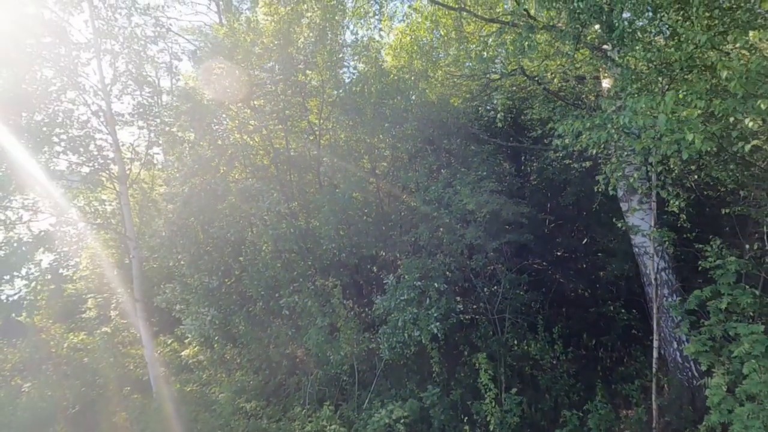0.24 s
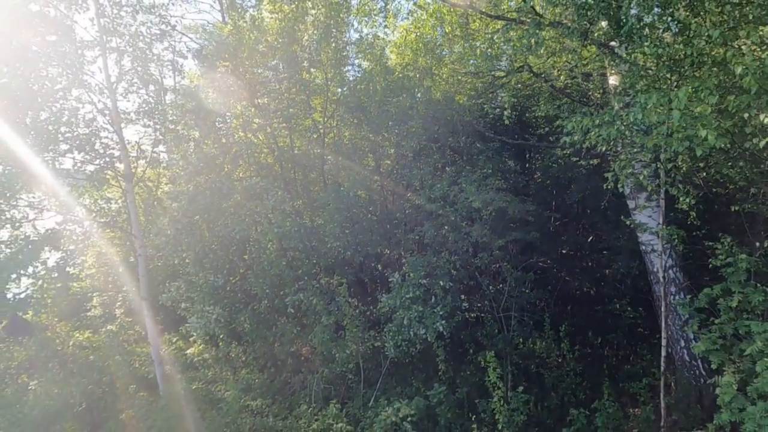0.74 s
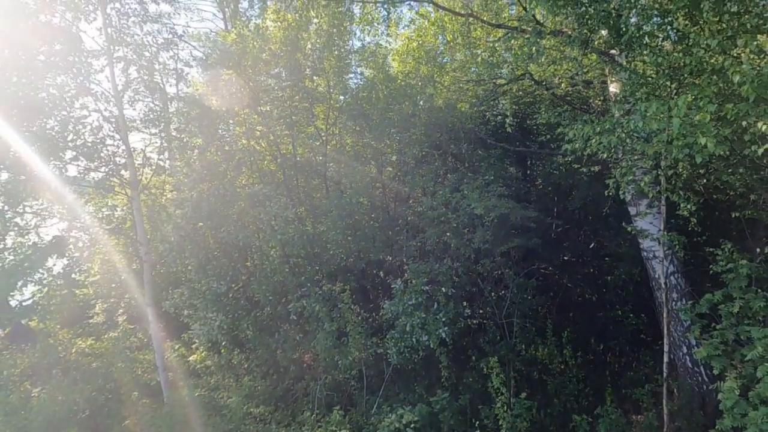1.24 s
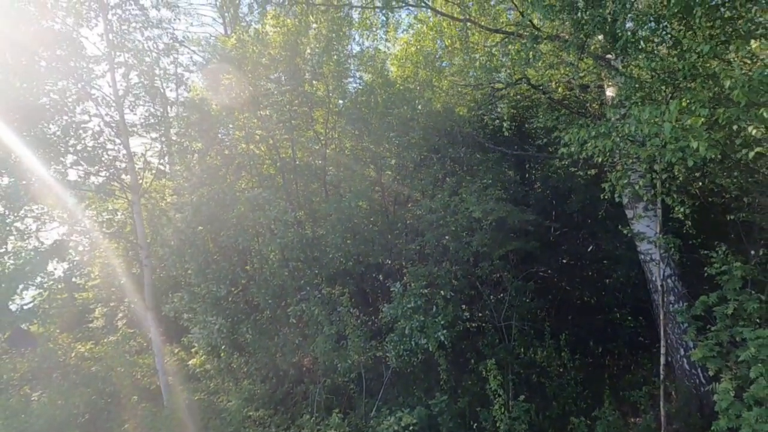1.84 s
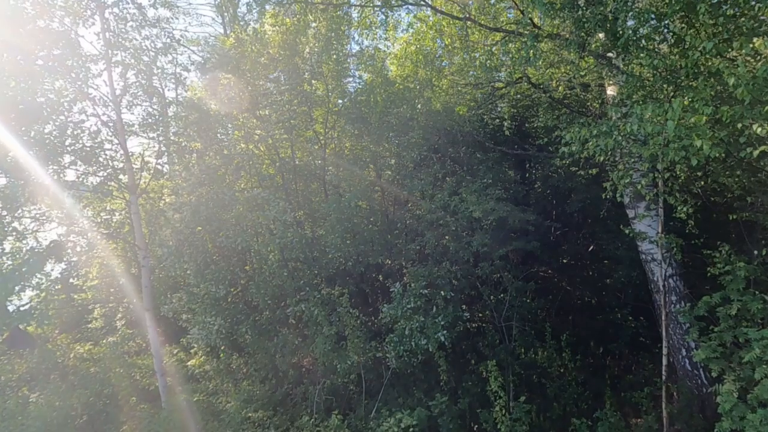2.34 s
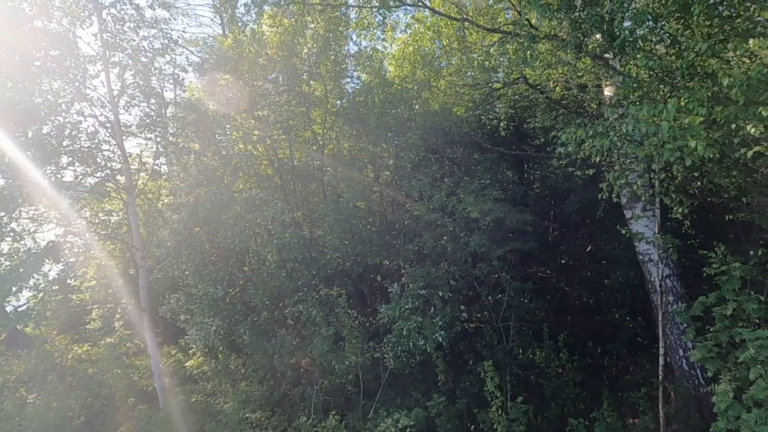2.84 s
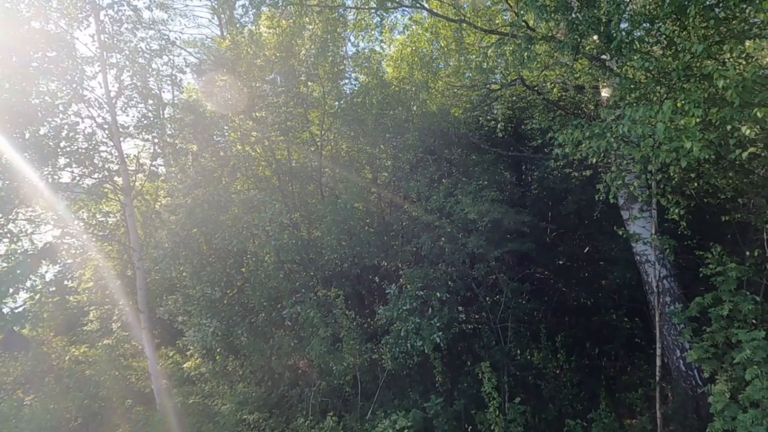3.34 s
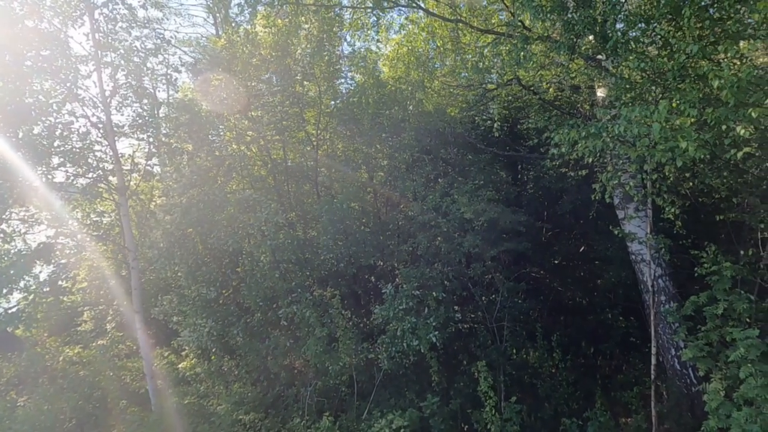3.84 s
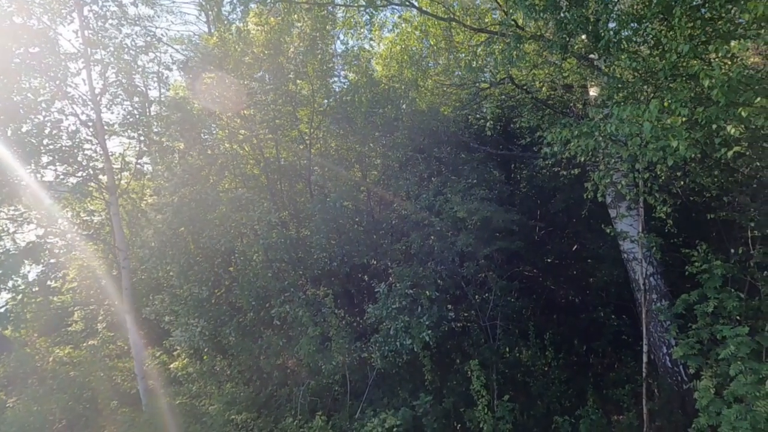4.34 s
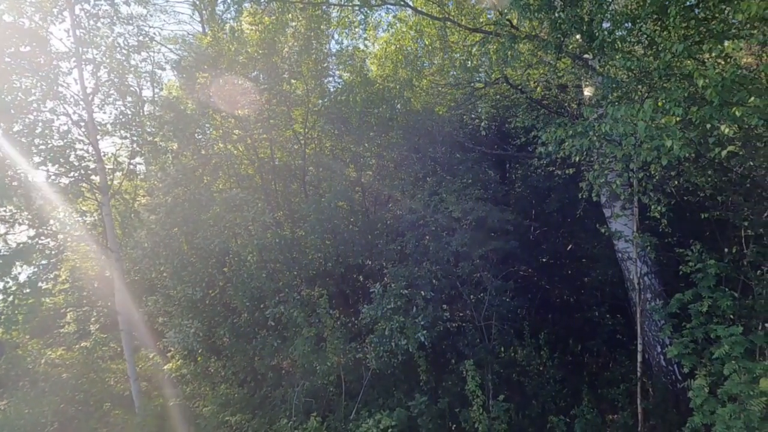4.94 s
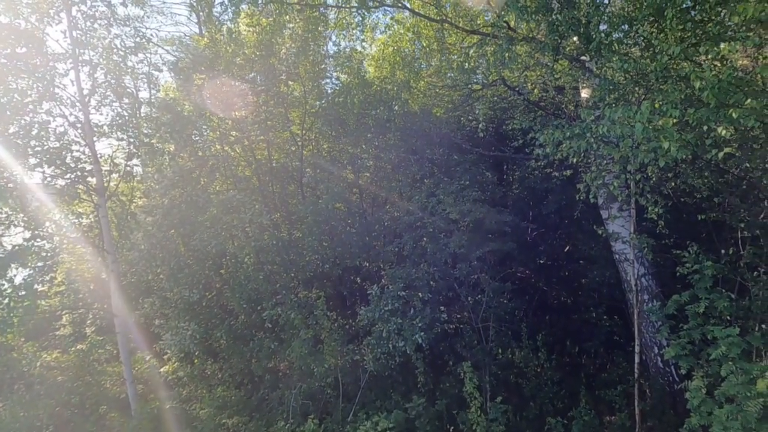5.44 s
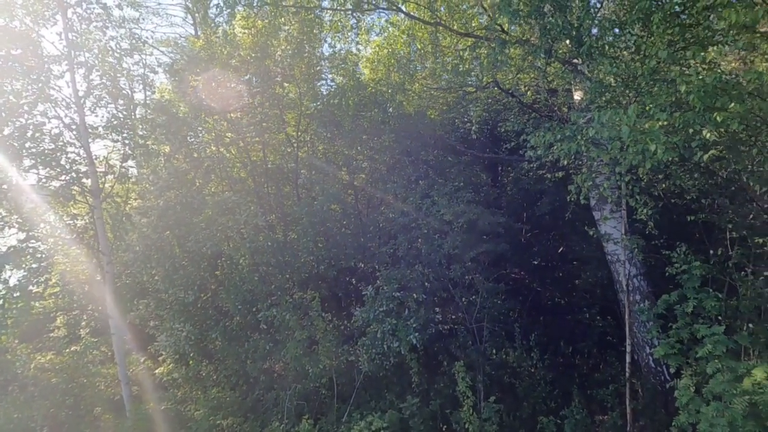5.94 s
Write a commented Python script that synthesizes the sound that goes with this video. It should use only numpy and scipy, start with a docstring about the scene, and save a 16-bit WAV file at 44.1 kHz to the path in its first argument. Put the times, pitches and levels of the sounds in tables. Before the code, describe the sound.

Low wobbling handling noise and muffled knocks cover quiet woodland birdsong. One clear near whistle swells and lifts at once, then a small snap. Farther birds sing thin chirps, regular little chucks and repeated falling notes, blurred by sparse tree echoes. Three brief throbbing trills stand out, the last near the end as the rumble calms. A faint hum fades midway; leaves and microphone hiss softly.

```python
"""One near whistle, three buzzy trills and a farther songster in a wood, heard by a small hand-held camera.
Voices are nearly pure gliding tones; blurred calls are throbbing noise bands. The trees add sparse echoes.
The hand shakes and bumps the camera: deep shaped noise and falling sweeps with a dull ring dominate.
Behind lie a fading low hum, a twig-like snap and a patchy hiss of leaves, far chorus and microphone."""
import sys
import numpy as np
from scipy import signal
from scipy.fft import rfft, irfft
from scipy.io import wavfile
from scipy.ndimage import uniform_filter1d

SR = 44100
rng = np.random.default_rng(int(sys.argv[2]) if len(sys.argv) > 2 else 0)


def log_audio(samples):
    """Write samples as a 16-bit WAV file to the path given in sys.argv[1]."""
    # one column per channel
    frames = np.atleast_2d(samples).T
    # limit to full scale, then quantise
    limited = np.clip(frames, -1, 1)
    pcm = np.round(limited * 32767).astype(np.int16)
    wavfile.write(sys.argv[1], SR, pcm)


N = 273420

# handling levels over time: t/s, slow shake level/dB, rumble level/dB
HANDLING_CURVE = [(0, -18.5, -32), (.6, -24.5, -41), (1.2, -26, -36.5), (1.75, -27.5, -40.5),
                  (2.15, -20, -38.5), (2.6, -16.5, -30), (3.1, -25, -33.5), (3.7, -33, -36),
                  (4.2, -23.5, -35.5), (4.7, -30.5, -35.5), (5.1, -21, -32.5), (5.5, -27.5, -43.5),
                  (5.9, -34.5, -47.5), (6.2, -59, -54.5)]


def gain_of(db):
    """Decibels to an amplitude factor."""
    return 10 ** (np.asarray(db) / 20)


def evened(x):
    """Scales to rms 1."""
    return x / np.sqrt(np.mean(x ** 2) + 1e-20)


def along(rows, column):
    """One column of a curve, interpolated at every sample."""
    columns = np.transpose(rows)
    return np.interp(np.arange(N) / SR, columns[0], columns[column])


def add(mix, start_s, sound):
    """Mixes a sound in at start_s, cut at the end of the mix."""
    part = mix[round(start_s * SR):][:len(sound)]
    part += sound[:len(part)]


def noise(points, count=N):
    """Gaussian noise of rms 1, shaped by (f/Hz, level/dB) points; near silent outside them."""
    f, db = np.transpose(points)
    hz = np.fft.rfftfreq(count, 1 / SR)
    shape = gain_of(np.interp(np.log(hz + 1), np.log(f + 1), db, -150, -150))
    return evened(irfft(rfft(rng.standard_normal(count)) * shape, count))


def sine(hz, overtone_db=-30):
    """A bird's voice of rms near 1: a tone with a weak octave overtone."""
    phase = 2 * np.pi * np.cumsum(hz) / SR
    return np.sqrt(2) * (np.sin(phase) + gain_of(overtone_db) * np.sin(2 * phase))


def wood(x, t60_s, build_s):
    """Echoes off trunks and leaves: sparse taps of random sign that build up, then die away."""
    taps = np.zeros(SR)
    at = np.arange(0, SR - 20, 20) + rng.integers(0, 20, (SR - 1) // 20)
    taps[at] = rng.choice([-1., 1.], at.shape)
    t = np.arange(SR) / SR
    taps *= gain_of(-60 * t / t60_s) * np.clip(t / build_s, 0, 1)
    return signal.fftconvolve(x, taps / np.linalg.norm(taps))[:N]


def near_birds():
    """The whistle, the trills and the snap, fairly dry: direct sound with weaker echoes."""
    # start t/s, centre f/Hz, level/dB before shaping, pace (1 = usual), climb/Hz, strokes last/s at pace 1
    trill_rows = [(2.813, 3350, -56, .97, 100, .104), (4.197, 3350, -52, .98, 160, .127),
                  (5.658, 3330, -49, .945, -30, .106)]
    whistles, trills = np.zeros((2, N))
    add(whistles, .015, whistle())
    for start_s, *row in trill_rows:
        add(trills, start_s, trill(*row))
    add(trills, .305, snap())
    whistle_echo = gain_of(-10) * wood(whistles, t60_s=.63, build_s=.008)
    trunk_echo = gain_of(-9) * wood(trills, t60_s=.11, build_s=.01)  # trunks close by
    far_echo = gain_of(-14.5) * wood(trills, t60_s=.62, build_s=.04)
    return whistles + whistle_echo + trills + trunk_echo + far_echo


def whistle():
    """A tone that starts flat and swells, then lifts in pitch and fades."""
    peak_hz, peak_db, overtone_db = 1918, -38, -41.5
    swell_s, swell_db, scoop_hz = .058, -19, -41
    lift_s, lift_db, lift_hz = .055, -10.5, 128
    t = np.arange(-swell_s, lift_s, 1 / SR)
    swell = np.maximum(-t / swell_s, 0)
    lift = np.maximum(t / lift_s, 0)
    hz = peak_hz + scoop_hz * swell ** 2 + lift_hz * lift ** 2
    level = gain_of(peak_db + swell_db * swell + lift_db * lift)
    return level * sine(hz, overtone_db) * signal.windows.tukey(len(t), .12)


def trill(hz, db, pace, climb_hz, strokes_s):
    """The pitch snaps up and slides down again, ever wider and slower; high is loud."""
    lead_s, lead_high = .032, .26  # lead-in slides down from this share of the swing above centre
    fast_per_s, slow_per_s, slowing_s = 62, 42, .04  # stroke rates at pace 1
    swing_hz, widening_s, growth_db, growing_s = 510, .046, 7.5, .18
    rise_db, fall_db, fall_s = -14, -5, .03
    t = np.arange(0, lead_s + strokes_s, pace / SR)  # clock of the trill: pace below 1 stretches it
    after = np.maximum(t - lead_s, 0)
    lead = np.clip(1 - t / lead_s, 0, 1)
    width = 1 - np.exp(-t / widening_s)

    rate_per_s = slow_per_s + (fast_per_s - slow_per_s) * np.exp(-after / slowing_s)
    turns = np.cumsum((t > lead_s) * rate_per_s) * pace / SR
    saw = uniform_filter1d(np.interp(turns % 1, [0, .13, 1], [-1, 1, -1]), size=60)
    saw = saw * (1 - lead) ** 6

    shape_db = rise_db * lead ** 2 + growth_db * (np.clip(t / growing_s, 0, 1) - 1)
    shape_db = shape_db + fall_db * np.clip(1 - (t[-1] - t) / fall_s, 0, 1) ** 2
    # strokes differ in strength and in height
    shape_db = shape_db + 2 * noise([(8, 0), (60, 0), (130, -12)], count=len(t))
    uneven_hz = 40 * noise([(8, 0), (30, 0), (80, -14)], count=len(t))
    level = gain_of(db + shape_db + 4 * saw * width) * signal.windows.tukey(len(t), .07)
    hz = hz + climb_hz * after / strokes_s + uneven_hz
    return level * sine(hz + swing_hz * (width * saw + lead_high * lead), overtone_db=-40.5)


def snap():
    """A twig-like snap with a short rustle: band noise under a fast and a slow decay."""
    t = np.arange(3000) / SR
    crack = np.clip(t / .0014, 0, 1) * gain_of(-60 * t / .014)
    rustle = gain_of(-13 - 60 * t / .32)
    grain = noise([(1200, 8), (2300, 3), (4500, 8.5), (9000, -14)], count=len(t))
    return gain_of(-53.5) * (crack + rustle) * grain


def far_birds():
    """Songs from deeper in the wood, as much echo as direct sound."""
    # single glides: start t/s, length/s, start f/Hz, end f/Hz, level/dB
    glides = [(.25, .07, 2210, 2290, -73), (.97, .18, 3750, 2750, -82), (1.485, .055, 4960, 4400, -74),
              (1.612, .042, 3850, 4850, -73), (1.729, .026, 3800, 4400, -71),
              (1.843, .062, 3850, 4650, -72), (1.945, .055, 4060, 4150, -69),
              (2.065, .065, 4120, 4150, -72), (2.207, .052, 4070, 4130, -66.5),
              (3.22, .14, 1575, 1560, -86), (3.505, .095, 4680, 4620, -74), (3.522, .07, 3850, 3850, -74),
              (3.69, .2, 1482, 1470, -84.5), (4.48, .05, 980, 1040, -77), (4.97, .16, 2830, 2880, -72),
              (5.18, .05, 3650, 4050, -69), (5.208, .03, 4000, 4750, -71.5), (.69, .11, 3400, 3760, -80),
              (5.235, .08, 4820, 4760, -74.5), (5.274, .024, 3800, 3000, -71.5),
              (5.3, .06, 3060, 3020, -75), (5.423, .035, 2980, 2540, -73), (5.512, .13, 2640, 2490, -73.5),
              (5.885, .075, 2200, 2520, -77), (5.945, .05, 2480, 3230, -73.5), (5.98, .07, 3200, 3170, -70),
              (6.108, .032, 3330, 3980, -69)]
    # recurring glides by name: length/s, start f/Hz, end f/Hz, level/dB
    figures = {"chuck": (.02, 2750, 1350, -74), "pipe": (.06, 1930, 1960, -81),
               "flick": (.025, 4140, 3550, -72), "dip": (.045, 3520, 3170, -73),
               "climb": (.066, 3270, 3950, -72), "pip": (.028, 4780, 4880, -76),
               "hook": (.02, 2620, 3040, -75)}
    # by figure name: list of start t/s
    figure_starts = {"chuck": [1.365, 1.532, 1.699, 1.865, 2.032, 2.372], "pipe": [1.513, 2.18, 2.847],
                     "flick": [1.997, 2.127, 2.257], "dip": [2.342, 2.525], "climb": [2.397, 2.575], "pip":
                     [3.058, 3.73, 3.908], "hook": [3.165, 3.315]}
    # a falling syllable sung again and again: start t/s, end f/Hz, level/dB at its end
    fall_rows = [(2.726, 2520, -68), (3.029, 2520, -68), (3.175, 2520, -67.5), (3.334, 2520, -67.5),
                 (3.452, 2250, -72.5), (3.627, 2250, -72), (3.797, 2250, -70), (3.96, 2250, -75),
                 (4.13, 2250, -74.5)]
    # blurred chirps: start t/s, length/s, centre f/Hz, level/dB
    chirp_rows = [(0.768, 0.17, 5540, -76), (1.304, 0.12, 5370, -72.5), (1.683, 0.039, 5680, -72),
                  (2.12, 0.068, 6030, -74), (2.842, 0.082, 6070, -77.5), (3.46, 0.042, 4830, -68),
                  (3.499, 0.071, 4380, -70.5), (4.068, 0.055, 4300, -73.5), (5.215, 0.11, 3870, -76)]
    # narrower warbles: start t/s, length/s, centre f/Hz, level/dB
    warbles = [(1.755, .03, 4150, -76), (4.77, .14, 2160, -78), (6.13, .05, 3720, -69)]
    fall_s, fall_top_hz, fall_gain_db = .076, 4900, 15
    buzz_s, buzz_hz, buzz_db = .05, 3930, -3.5  # rides on the upper part of a fall; level relative to it
    dry, falls = np.zeros((2, N))
    for start_s, *row in glides:
        add(dry, start_s, note(*row))
    for name, row in figures.items():
        for start_s in figure_starts[name]:
            add(dry, start_s, note(*row))
    for start_s, end_hz, db in fall_rows:
        add(falls, start_s, note(fall_s, fall_top_hz, end_hz, db, fall_gain_db))
        add(dry, start_s, chirp(buzz_s, buzz_hz, db + buzz_db))
    for start_s, *row in chirp_rows:
        add(dry, start_s, chirp(*row))
    for start_s, *row in warbles:
        add(dry, start_s, chirp(*row, share=.1))
    near_trees = gain_of(-7) * wood(dry + falls, t60_s=.1, build_s=.003)
    # the singer of the falls sits nearer: its falling tones get less far echo
    deep_trees = wood(dry + gain_of(-5) * falls, t60_s=.82, build_s=.012)
    return dry + falls + near_trees + deep_trees


def note(length_s, start_hz, end_hz, db, gain_db=0):
    """A soft-ended glide, gaining gain_db on its way; moving air and leaves make it flutter and waver."""
    bend = 1.3  # starts fast, eases into the end pitch
    u = np.linspace(0, 1, round(length_s * SR))
    chance = rng.standard_normal((2, len(u) + 300))
    smooth = uniform_filter1d(uniform_filter1d(chance, size=130), size=130)
    flutter, waver = 14 * smooth[:, 150:-150]  # rms near 1
    hz = (end_hz + (start_hz - end_hz) * (1 - u) ** bend) * (1 + .007 * waver)
    level = gain_of(db + gain_db * (u - 1) + 2.2 * flutter)
    return level * sine(hz) * signal.windows.tukey(len(u), .5)


def chirp(length_s, hz, db, share=.4):
    """A blurred, throbbing band of fuzz: a chirp or the buzzy part of a call; share = half width / centre."""
    count, width_hz = round(length_s * SR), share * hz
    edges = [(hz - width_hz, -20), (hz - width_hz / 3, 0), (hz + width_hz / 3, 0), (hz + width_hz, -20)]
    band = noise(edges, count=count)
    throb = 1 + .38 * np.sin(2 * np.pi * (44 * np.arange(count) / SR + rng.random()))  # 44 Hz
    return gain_of(db) * band * throb * signal.windows.tukey(count, .5)


def thumps():
    """All bumps on the camera body; those in one stretch are duller."""
    # start t/s, level/dB, ring f/Hz
    bumps = [(0.775, -31.5, 52), (1.079, -34, 62), (1.186, -31, 55), (1.726, -17.5, 69.6),
             (1.936, -26.5, 45.3), (2.117, -26, 70.5), (2.204, -18.5, 49), (2.493, -29.5, 65.4),
             (2.628, -31.5, 46), (3.024, -28, 53), (3.194, -27.5, 67.5), (3.32, -30, 68.6),
             (3.384, -32, 64), (3.438, -31, 64), (3.574, -24.5, 62), (3.743, -30.5, 47.6),
             (3.923, -22, 79.4), (4.2, -34.5, 69.6), (4.318, -23, 65.2), (5.524, -30.5, 81),
             (5.588, -26.5, 57), (6.009, -39, 73.7)]
    dull_from_s, dull_to_s = .7, 2.7
    out = np.zeros(N)
    for start_s, db, ring_hz in bumps:
        add(out, start_s, gain_of(db) * bump(ring_hz, dull_from_s < start_s < dull_to_s))
    return out


def bump(ring_hz, dull):
    """A bump spreads through the body, its high part first: a falling sweep, then a dull ring."""
    sweep_span_hz = 178.2 * (.5 if dull else 1)
    skirt_db = -24 + (-17 if dull else 0)  # upper skirt of the ring
    t = np.arange(round(.3 * SR)) / SR
    hz = .88 * ring_hz + sweep_span_hz * np.exp(-t / .0092)
    sweep = np.sin(2 * np.pi * np.cumsum(hz) / SR) * (t / .015) ** 2 * np.exp(2 - 2 * t / .014)
    spectrum = [(.5 * ring_hz, -20), (ring_hz, 0), (1.44 * ring_hz, -4), (180, skirt_db), (300, -38)]
    ring = noise(spectrum, count=len(t))
    return sweep + ring * np.clip(t / .019, 0, 1) * gain_of(-2.5 - 60 * t / .27)


def handling():
    """Shake and rumble, ramped up at the start, plus the hum; rumble and hum share their lumps."""
    lumps = noise([(1, -13.5), (6, -4), (14, -22)])
    ramp = np.clip(.15 + np.arange(N) / SR / .05, 0, 1)
    rumbling, humming = rumble(lumps), hum(lumps)
    return (shake() + rumbling) * ramp + humming


def shake():
    """The slow shake of the hand: very low noise that follows the handling curve."""
    # f/Hz, density level/dB
    shake_spectrum = [(2, -7.5), (7, -4), (11, -1.5), (16, -15.5), (24, -17), (36, -39.5)]
    return gain_of(along(HANDLING_CURVE, column=1)) * noise(shake_spectrum)


def rumble(lumps):
    """Low noise made lumpy by a slow random level, following the handling curve."""
    # f/Hz, density level/dB
    rumble_spectrum = [(12, -6.5), (25, 4), (60, 0), (95, -14.5), (130, -25), (180, -50.5), (320, -46)]
    lumpy = evened(noise(rumble_spectrum) * gain_of(1.4 * lumps))
    return gain_of(along(HANDLING_CURVE, column=2)) * lumpy


def hum(lumps):
    """Low banded noise that sinks, then fades out."""
    # f/Hz, level/dB
    hum_spectrum = [(100, 0.5), (155, -1), (195, -19.5), (243, 2), (330, -23.5)]
    start_db, sink_db, sink_s, end_s = -49.5, -20.5, 1.24, 3.06
    t = np.arange(N) / SR
    db = start_db + sink_db * (1 - np.exp(-(t / sink_s) ** 2))
    fade_out = np.clip((end_s - t) / .3, 0, 1)
    return gain_of(db + 2.45 * lumps) * fade_out * noise(hum_spectrum)


def air():
    """Leaves, far chorus and microphone hiss: noise with drifting time-frequency patches."""
    # f/Hz, level/dB
    air_spectrum = [(150, 3.5), (250, -1.5), (412, -3), (781, -9), (978, -11.5), (2090, -17), (3060, -17.5),
                    (5040, -21), (11900, -31.5), (16800, -31.5)]
    mid_db, settle_db_per_s = -67, -.5  # level at mid-scene; the leaves slowly settle
    _, _, z = signal.stft(noise(air_spectrum), nperseg=512, noverlap=384)
    patches = uniform_filter1d(rng.standard_normal(z.shape), size=8, axis=0)  # over frequency
    patches = evened(uniform_filter1d(patches, size=20, axis=1))  # over time
    _, patchy = signal.istft(z * gain_of(1.68 * patches), nperseg=512, noverlap=384)
    level_db = mid_db + settle_db_per_s * (np.arange(N) - N / 2) / SR
    return gain_of(level_db) * evened(patchy[:N])


def scene():
    """All sources at the one microphone."""
    return (near_birds() + far_birds() + thumps() + handling() + air())[None]


def record(dry):
    """The band limit: a steep linear-phase lowpass."""
    edge_hz = 15680
    lowpass = signal.firwin(1023, edge_hz, window=("kaiser", 9), fs=SR)
    return signal.oaconvolve(dry, lowpass[None], "same")


dry = scene()
out = record(dry)
log_audio(out)
```